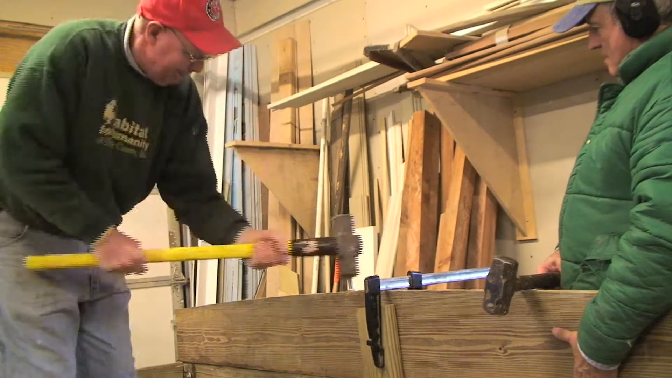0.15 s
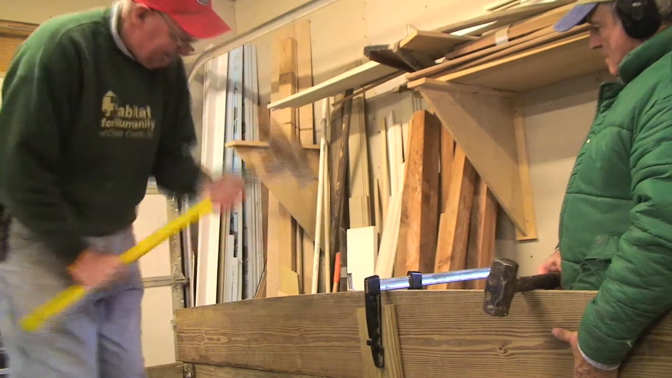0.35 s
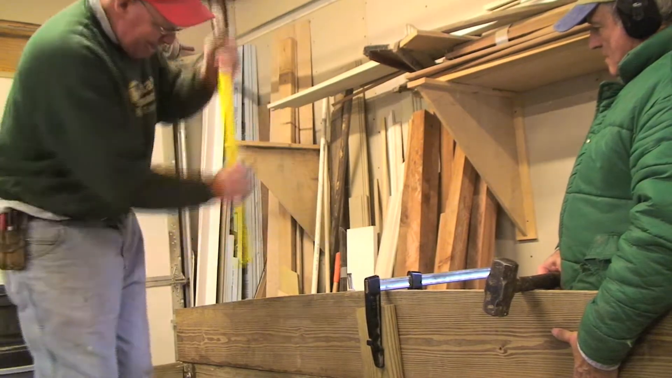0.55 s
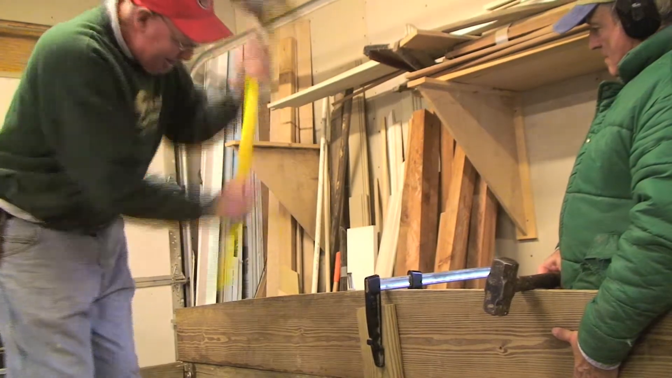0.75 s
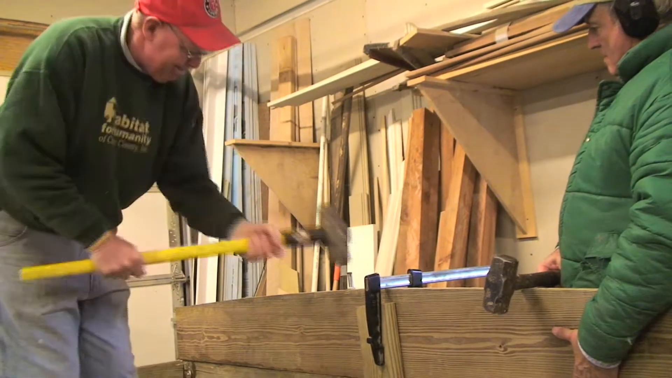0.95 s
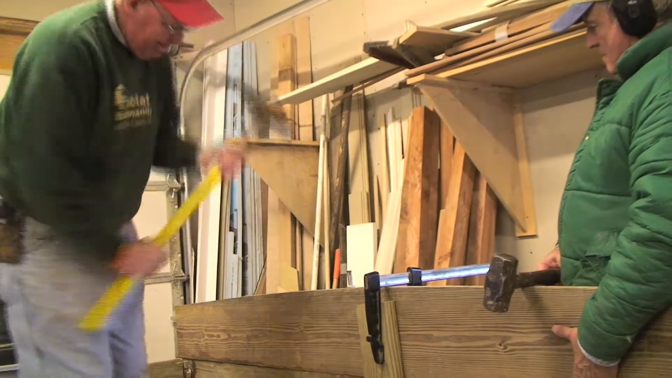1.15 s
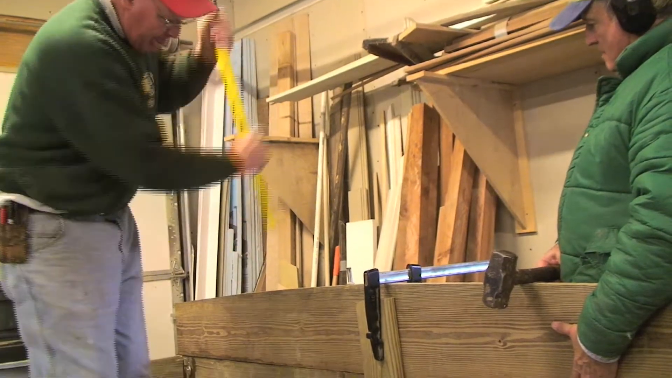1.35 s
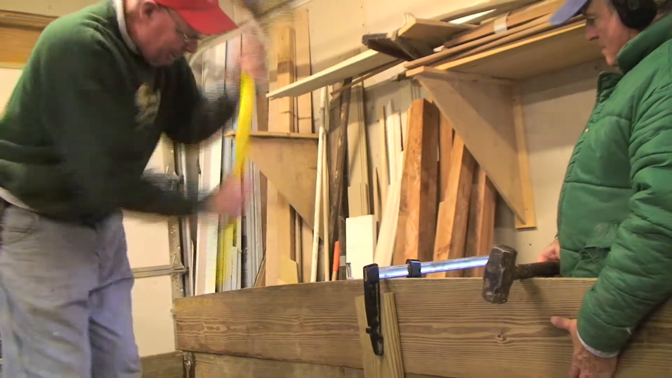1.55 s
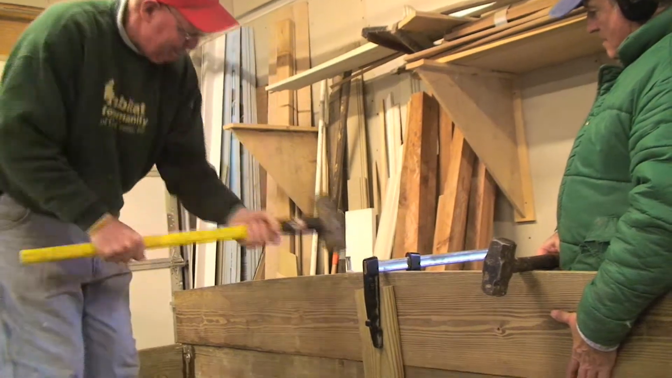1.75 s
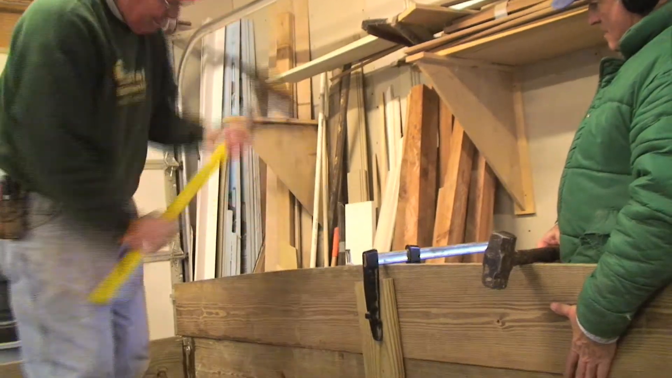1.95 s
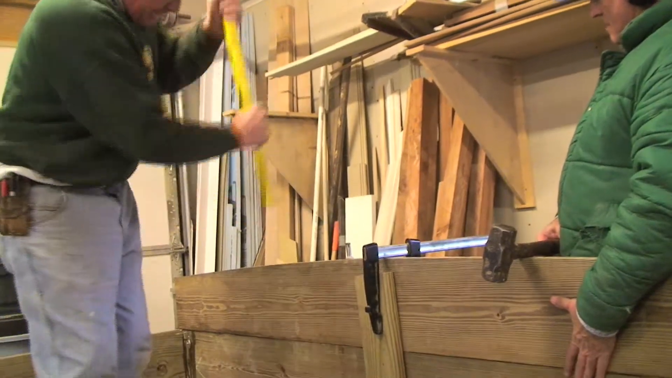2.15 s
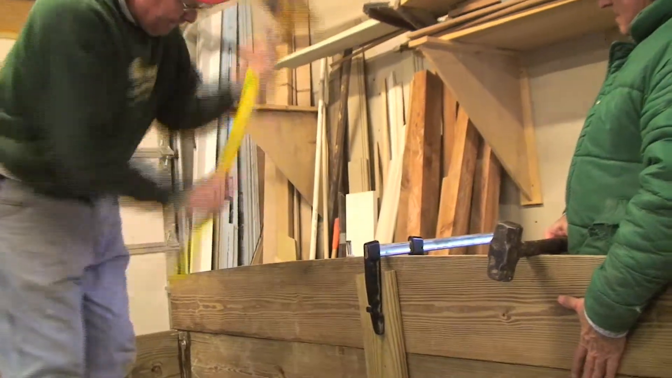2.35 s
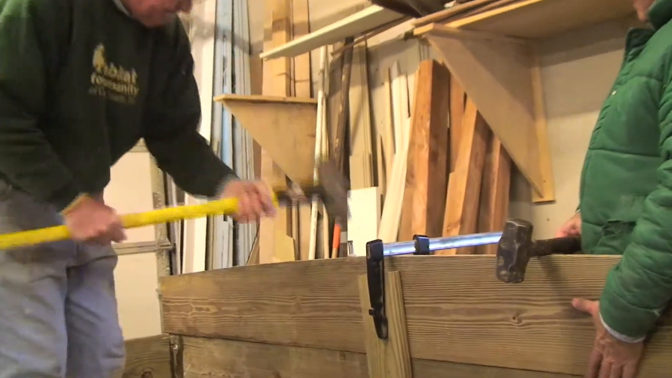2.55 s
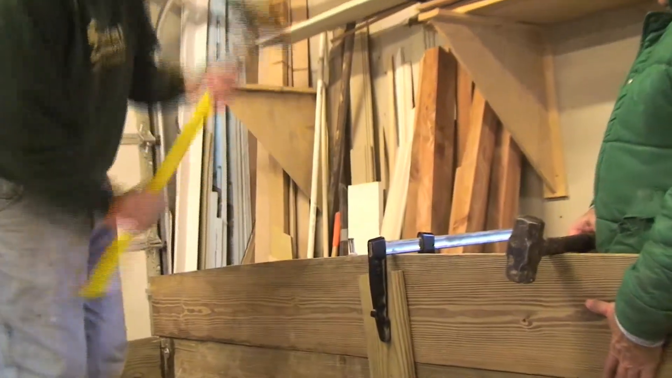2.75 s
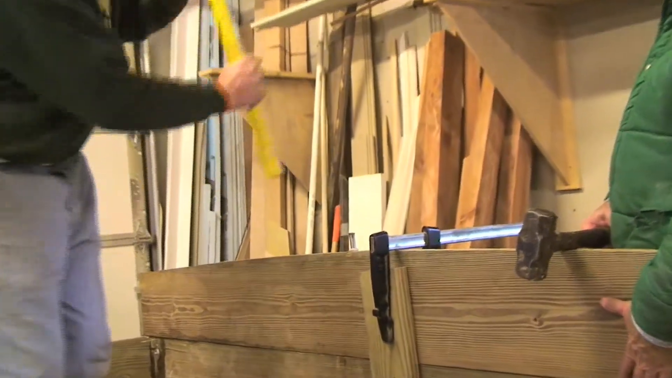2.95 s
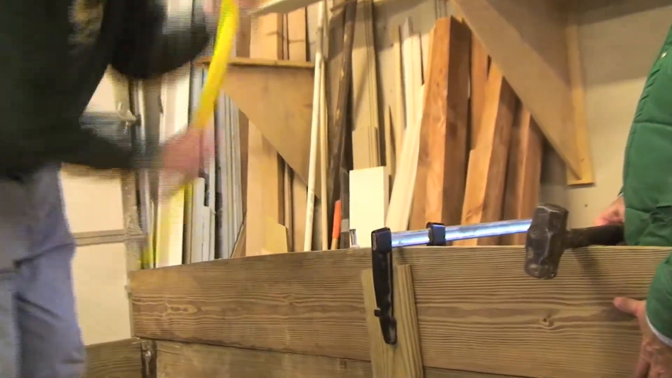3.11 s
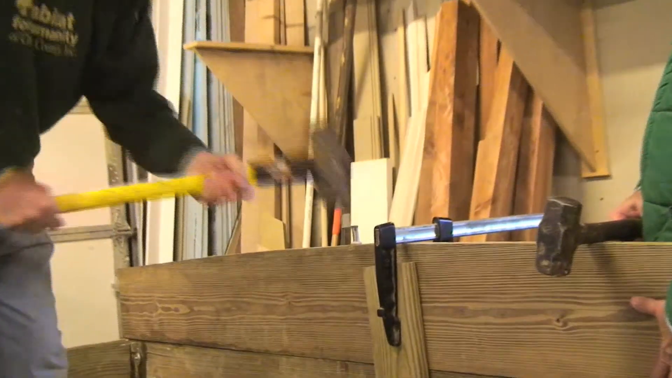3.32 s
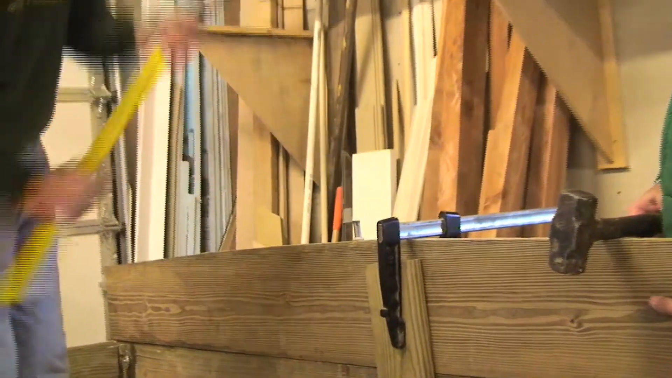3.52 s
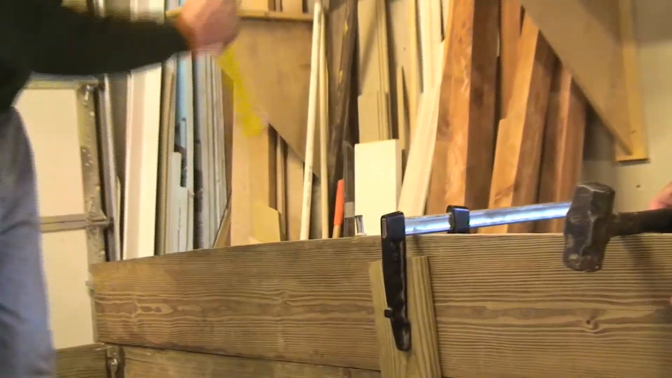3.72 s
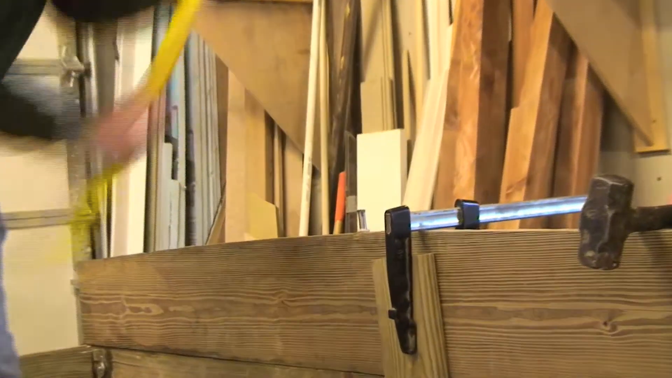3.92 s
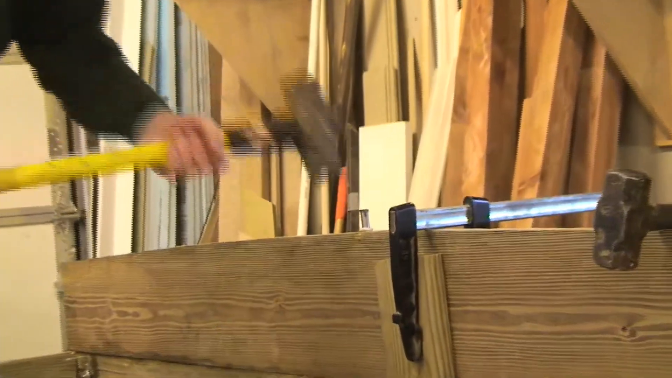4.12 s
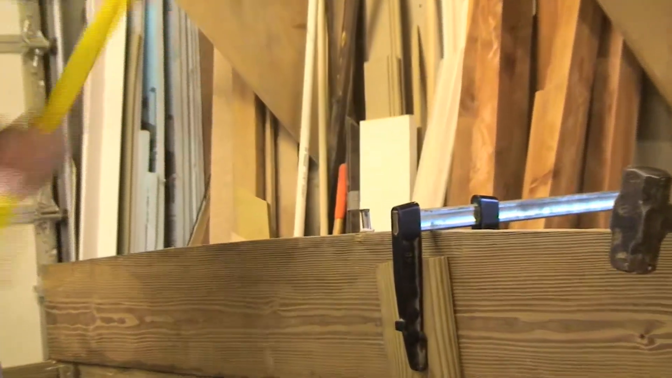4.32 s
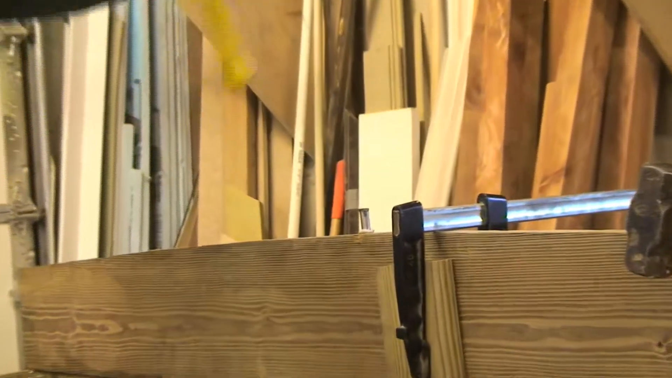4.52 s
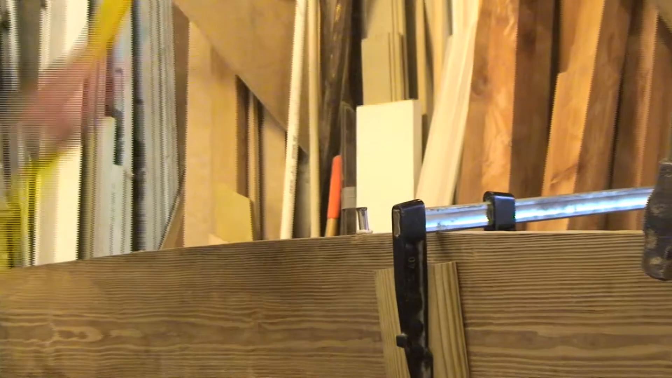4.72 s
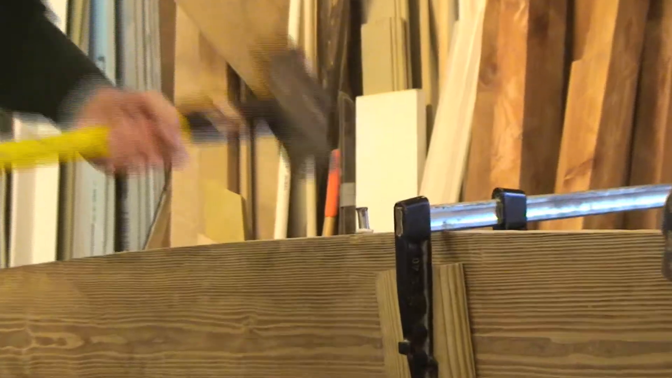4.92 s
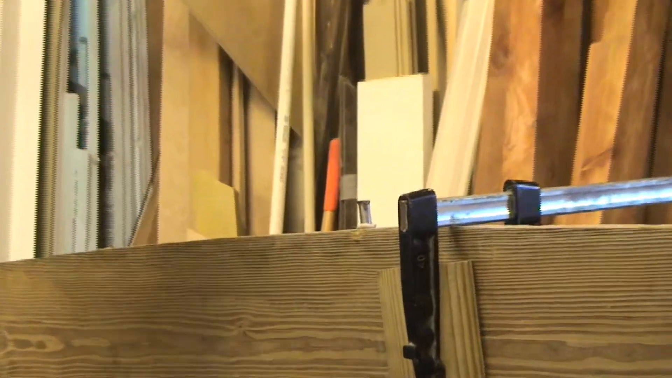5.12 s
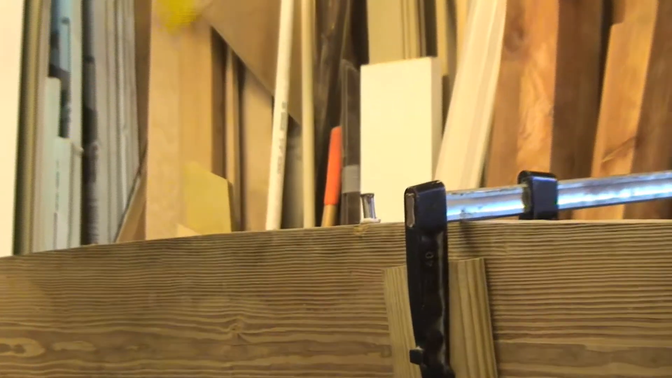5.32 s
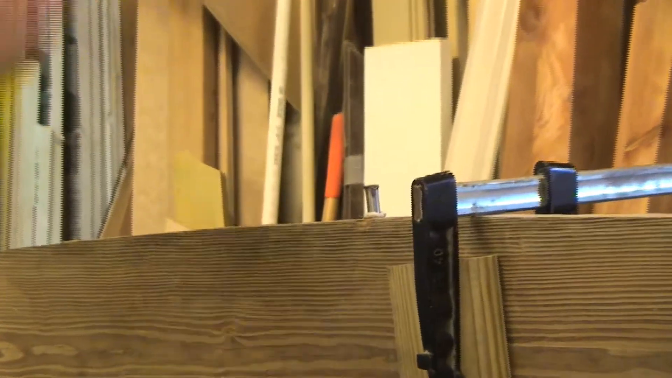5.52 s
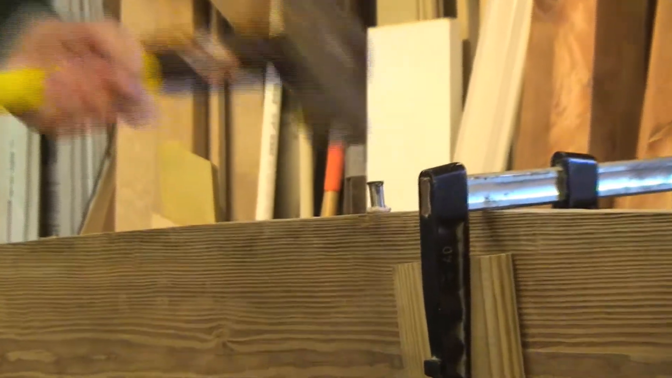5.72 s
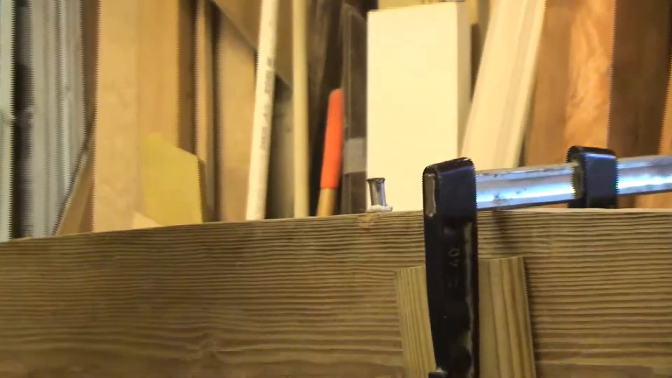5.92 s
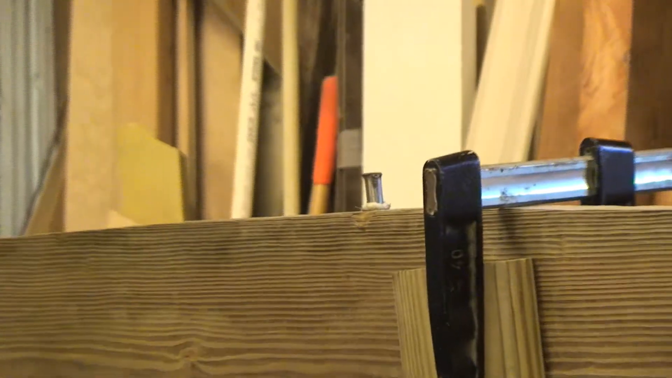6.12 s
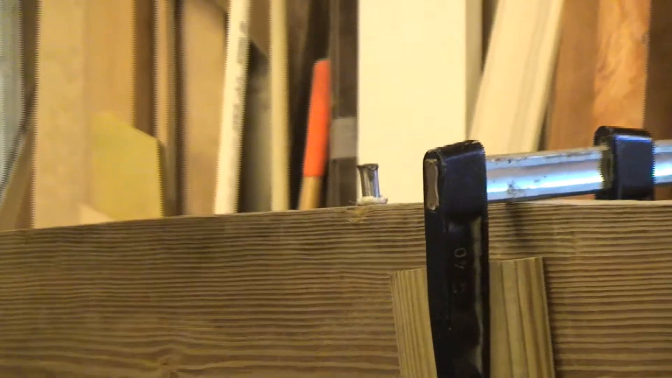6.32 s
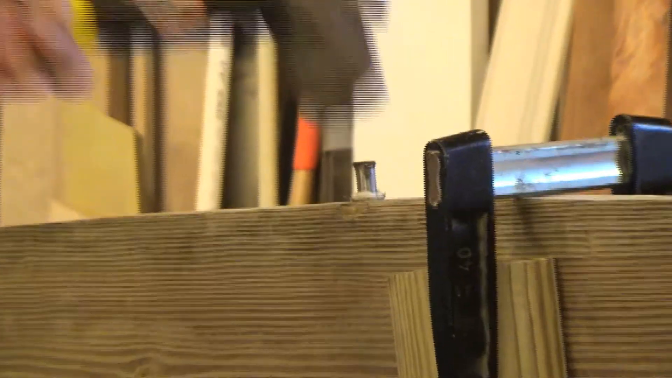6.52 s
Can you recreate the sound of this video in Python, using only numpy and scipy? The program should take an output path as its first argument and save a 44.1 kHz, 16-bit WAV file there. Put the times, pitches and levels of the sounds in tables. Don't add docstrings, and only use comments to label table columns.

```python
import sys
import numpy as np
from scipy import signal
from scipy.fft import rfft, irfft
from scipy.io import wavfile
from scipy.ndimage import uniform_filter1d

SR = 44100
rng = np.random.default_rng(int(sys.argv[2]) if len(sys.argv) > 2 else 0)


def linear_from_db(decibels):
    return 10 ** (np.asarray(decibels, float) / 20)


def wav_out(sig):
    wavfile.write(sys.argv[1], SR, np.round(np.clip(np.atleast_2d(sig).T, -1, 1) * 32767).astype(np.int16))


N = 289296

# (time [s], strength [dB], steel brightness [dB], wood weight [dB], bolt ring [dB])
BLOWS = [
    (0.135, 0, -2, 0.5, -8),
    (0.906, 0, -2.5, 0.5, 3.5),
    (1.699, -1.5, -1.5, 1.5, 2.5),
    (2.474, 0.5, -3, -1, -1.6),
    (3.248, 0, -2.5, -1, -2.2),
    (4.029, -1, -1, 0.5, 1.5),
    (4.832, -1.5, -1.5, 1, 1),
    (5.645, -1, -1.5, -0.5, 0.5),
    (6.458, 0, -2.5, -1.5, 0.8),
]
KNOCK_DB, CLANG_DB, ROOM_DB = -2.5, 2.5, -7
CLANG_LAG_S, START_OFFSET_S = .001, .0014
BOLT_HZ, BOLT_WIDTH_HZ = 2300, 690


def hammer(tails):
    out = np.zeros(N)
    t = np.arange(100) / SR
    knock, clang = wood_knock(), steel_clang()
    forerunner = ring([(2200, 0, .01)], size=500)
    woods = clamp() + planks(len(BLOWS))
    bolts = signal.lfilter(*signal.iirpeak(BOLT_HZ, BOLT_HZ / BOLT_WIDTH_HZ, fs=SR), tails)
    lows = signal.sosfilt(signal.butter(1, 1500, fs=SR, output="sos"), tails)
    chatter = rng.standard_normal((len(BLOWS), 100)) * np.exp(-t / 0.00017)
    chatter = uniform_filter1d(chatter, size=3)
    for blow, rough, tail, low, bolt, wood in zip(BLOWS, chatter, tails, lows, bolts, woods):
        s, db, steel_db, wood_db, bolt_db = blow
        s += START_OFFSET_S
        contact = .08 * rough
        contact[0] += 1
        wood_part = linear_from_db(wood_db) * (low + wood)
        steel_part = linear_from_db(steel_db) * (tail - low + (linear_from_db(bolt_db) - 1) * bolt)
        add(out, s, linear_from_db(db + ROOM_DB) * (wood_part + steel_part))
        add(out, s - CLANG_LAG_S, linear_from_db(db + KNOCK_DB + wood_db) * np.convolve(knock, contact))
        add(out, s - 1.8 * CLANG_LAG_S, linear_from_db(db - 20) * forerunner)
        add(out, s, linear_from_db(db + CLANG_DB + steel_db) * np.convolve(clang, contact))
    return out


# (frequency [Hz], level [dB], t60 [s])
KNOCK_MODES = [(980, 6, 0.0023), (1570, -2, 0.021), (2250, -6, 0.014), (138, -16, 0.074), (249, -9, 0.14),
               (419.7, -13.5, 0.63), (631, -16, .12), (862, -10.5, 0.19)]


def wood_knock():
    t = np.arange(2000) / SR
    return with_echoes(ring(KNOCK_MODES, size=2000) * (1 - np.exp(-(t / 0.00014) ** 2)))


# (frequency [Hz], level [dB], t60 [s])
CLANG_MODES = [(4360, 3.5, 0.0047), (3630, -8, 0.0013), (7230, -2, 0.0043), (11400, -21, 0.0013)]


def steel_clang():
    t = np.arange(2000) / SR
    return with_echoes(ring(CLANG_MODES, size=2000) * (1 - np.exp(-t / .00012)))


# (frequency [Hz], level [dB], t60 [s])
PLANK_MODES = [(94.3, -19.5, 1), (122.7, -13.5, 0.37), (162.2, -14.5, 0.22), (222.5, 3, .4),
               (264.2, -10, 0.34), (296.5, 2.5, .4), (310, -6, 0.18), (364, -8.5, 0.15), (368, -11, 0.17),
               (412.4, -4.5, 0.44), (476, -17, 0.19), (478, -7.5, 0.2), (520, -9.5, 0.21), (593, -15.5, 1),
               (623, -14, 0.15), (776, -11.5, 0.12), (692, -11.5, 0.14), (821, -10.5, .45),
               (968, -10.5, 0.18), (902, -8.5, 0.08), (1096, -7, 0.5), (1596, -17, 1), (1980, -14, 0.16),
               (2490, -10.5, 0.3), (3320, -22, .35), (4540, -21, 0.46), (12550, -31.5, .4)]
PLANKS_DB, SCATTER_DB = -6, 1.8


def planks(count):
    modes = [(-1) ** k * ring([mode], size=SR, swell=True) for k, mode in enumerate(PLANK_MODES)]
    scatter = SCATTER_DB * rng.standard_normal((count, len(PLANK_MODES)))
    return linear_from_db(PLANKS_DB + scatter) @ np.array(modes)


def clamp():
    t = np.arange(SR) / SR
    decay = linear_from_db(-17 - 60.0 * t / 0.94)
    beat = np.sin(2 * np.pi * 2.2 * t + 1.4)
    return decay * np.sin(2 * np.pi * 265 * t) * beat * np.minimum(t / 0.28, 1)


# (delay [s], level [dB])
ECHOES = [(.0025, -10), (.0065, -1), (.0100, -7), (0.016, -8.5), (0.023, -14)]
ECHO_TOP_HZ = 7900


def with_echoes(x):
    out = np.concatenate([x, np.zeros(2000)])
    dull = signal.lfilter(*signal.butter(2, ECHO_TOP_HZ, fs=SR), x)
    for lag_s, db in ECHOES:
        add(out, lag_s, linear_from_db(db) * dull)
    return out


# (frequency [Hz], level [dB per Hz])
ROOM_COLOUR = [(40, -18), (150, -7.5), (280, -1.5), (900, -9), (1300, -15), (1900, -13), (2600, -13),
               (2900, -16.5), (5000, -17), (5700, -23.5), (7800, -26), (8800, -34.5), (12800, -34.5),
               (16000, -38)]
# (frequency [Hz], t60 [s])
ROOM_T60 = [(60, .7), (250, 0.66), (700, 0.51), (2300, 0.51), (5000, 0.48), (9000, 0.42), (13000, 0.3),
            (16000, .25)]
# (frequency [Hz], time constant [s])
BUILD_UP = [(60, 0.085), (250, 0.023), (700, 0.004), (3000, 0.0011), (16000, 0.0017)]
# (frequency [Hz], share [0-1])
RENEWED = [(200, .08), (800, .25), (4000, .25), (10000, .4)]
MODAL_HZ = 580


def room_tails(count):
    t, tails = np.arange(SR) / SR, 0
    for hz in 50 * 2 ** (np.arange(26) / 3):
        rise = 1 - np.exp(-t / on_log(BUILD_UP, hz))
        band_db = on_log(ROOM_COLOUR, hz) + 10 * np.log10(hz / 1000)
        decay = linear_from_db(band_db - 60.0 * t / on_log(ROOM_T60, hz))
        sparse = 1 / (1 + (MODAL_HZ / hz) ** 2) ** .5

        def colour(f):
            return hump(hz, 1 / 6)(f) * linear_from_db(on_log(ROOM_COLOUR, f))

        same, *fresh = [noise(colour, size=SR) for _ in range(count + 1)]
        new = on_log(RENEWED, hz)
        pattern = np.sqrt(1 - new) * same + np.sqrt(new) * np.array(fresh)
        tails = tails + decay * sparse * rise * pattern
    loudest = np.max(uniform_filter1d(tails[0] ** 2, size=2000))
    return tails / loudest ** .5


# (time [s], level [dB])
TICKS = [
    (0.757, -48),
]
# (frequency [Hz], level [dB], t60 [s])
TICK_MODES = [(450, -5.5, .015), (900, 0, .01), (1900, -3, .006), (3800, -5, .007), (5900, -4, .008),
              (7000, -5.5, .005)]


def tick(tail):
    out, direct = np.zeros(N), ring(TICK_MODES, size=3000)
    short_tail = tail * linear_from_db(-90 * np.arange(SR) / SR)
    bright_tail = signal.lfilter([1, -.9], 1, short_tail)
    wet = signal.fftconvolve(direct, bright_tail)
    for s, db in TICKS:
        add(out, s, linear_from_db(db) * direct)
        add(out, s, linear_from_db(db - 11.5) * wet / np.std(wet[:4000]))
    return out


# (centre [Hz], spread [octaves])
MOVE_BANDS = [(58, .3), (250, .7), (2100, .35), (3300, .8)]
# (start [s], length [s], rumble level [dB])
GRIPS = [(0.0, 0.083, -66), (0.27, 0.088, -36.5), (0.46, 0.22, -54), (0.72, .16, -62), (1.21, .11, -45.5),
         (1.41, 0.12, -50.5), (2.13, 0.044, -51), (2.25, 0.06, -55), (2.34, .06, -46.5), (2.9, 0.094, -64),
         (3.62, 0.18, -55.5), (3.84, .07, -61), (3.92, 0.088, -54.5), (4.4, 0.052, -60), (4.54, .04, -55),
         (4.61, 0.053, -63.5), (5.29, 0.074, -56.5)]
# (start [s], length [s], level [dB])
STEPS = [
    (0.63, .05, -67.5),
    (0.82, 0.059, -57),
    (1.26, 0.029, -43.5),
    (1.39, 0.074, -52.5),
    (2.34, 0.048, -61),
    (3.74, 0.045, -65),
    (3.88, .1, -65),
    (4.54, 0.036, -58.5),
    (5.5, 0.16, -66.5),
    (6.38, 0.068, -69),
]
# (start [s], length [s], sleeve level [dB], swish level [dB])
RUBS = [
    (0.0, 0.15, -73.5, -89),
    (0.63, 0.035, -65.5, -73),
    (0.78, .12, -71.5, -74.5),
    (2.3, .17, -75.5, -80),
    (3.7, 0.3, -69.5, -74),
    (4.62, .2, -73.5, -80),
    (5.44, .12, -76.5, -84),
    (5.565, 0.07, -68, -62),
    (6.22, 0.3, -71, -72.5),
]
CLOTH_SLOWER = 2.5


def movement():
    rumble, shuffle, sleeve, swish = [noise(hump(hz, octaves)) for hz, octaves in MOVE_BANDS]
    out = gestures(GRIPS) * rumble * flicker(14, 1.3)
    out += gestures(STEPS) * shuffle * flicker(35, 1.4)
    out += gestures(RUBS, slower=CLOTH_SLOWER) * sleeve * flicker(30, 1.1)
    out += gestures(RUBS, column=3, slower=CLOTH_SLOWER) * swish * flicker(40, 1.4)
    return out + shudder()


EASE_IN_S, EASE_OUT_S = 0.028, .07


def gestures(rows, column=2, slower=1):
    t, power = np.arange(N) / SR, 0
    for row in rows:
        corners = [-EASE_IN_S * slower, 0, row[1], row[1] + EASE_OUT_S * slower]
        shape = np.interp(t - row[0], corners, [0, 1, 1, 0])
        power = power + (linear_from_db(row[column]) * shape ** 2) ** 2
    return np.sqrt(power)


SHUDDER_DB, SHUDDER_RISE_S, SHUDDER_T60_S = -34.5, 0.068, .8


def shudder():
    level, t = np.zeros(N), np.arange(SR) / SR
    for s, db, *_ in BLOWS:
        decay = linear_from_db(SHUDDER_DB + db - 60.0 * t / SHUDDER_T60_S)
        add(level, s, (1 - np.exp(-t / SHUDDER_RISE_S)) * decay)
    return level * noise(hump(73, .55))


# (frequency [Hz], level [dB per Hz])
SHOP_SPECTRUM = [(15, -23.5), (25, 2.5), (59, 0), (212, -6.5), (277, -3.5), (394, -8.5), (476, -18.5),
                 (531, -10), (1370, -22.5), (2350, -26), (5280, -33), (13600, -34), (16000, -50)]
SHOP_DB, DRONE_DB, DRONE_HZ = -64, -70, 268


def shop():
    drone = linear_from_db(DRONE_DB) * noise(hump(DRONE_HZ, 0.027)) * flicker(3, 1.2)
    return drone + linear_from_db(SHOP_DB) * noise(lambda hz: linear_from_db(on_log(SHOP_SPECTRUM, hz)))


# (frequency [Hz], time constant [s])
MODE_SWELL = [(100, 0.0064), (250, 0.054), (450, 0.019), (2500, .01)]
LONGEST_T60_S = .64


def ring(modes, size, swell=False):
    t, out = np.arange(size) / SR, 0
    for k, (hz, db, t60) in enumerate(modes):
        rise = 1 - np.exp(-(t / on_log(MODE_SWELL, hz)) ** 2) if swell else 1
        decay = linear_from_db(db - 60 * t / min(t60, LONGEST_T60_S))
        out = out + (-1) ** k * rise * decay * np.sin(2 * np.pi * hz * t)
    return out


def noise(gain_of_hz, size=N):
    hz = np.maximum(np.arange(size // 2 + 1) * SR / size, 1)
    x = irfft(rfft(rng.standard_normal(size)) * gain_of_hz(hz), size)
    return x / np.std(x)


def hump(centre_hz, octaves):
    return lambda hz: np.exp(-.5 * (np.log2(hz / centre_hz) / octaves) ** 2)


def flicker(rate_hz, depth_db):
    return linear_from_db(depth_db * noise(lambda hz: 1 / (1 + (hz / rate_hz) ** 2)))


def on_log(table, hz):
    rows = np.array(table)
    return np.interp(np.log(hz), np.log(rows[:, 0]), rows[:, 1])


def add(out, s, x):
    i = int(s * SR)
    out[i:i + len(x)] += x[:len(out) - i]


def scene():
    tails = room_tails(count=len(BLOWS))
    return (hammer(tails) + tick(tails[0]) + movement() + shop())[None]


def roll_off(x):
    return signal.sosfilt(signal.butter(12, 16480, fs=SR, output="sos"), x)


SQUEEZE_S, SQUEEZE_KNEE_DB, SQUEEZE = 0.01, -23, 0.18
CHARGE_S, SAG = .004, .2
TOP_HZ, PREAMP_HZ = 15750, 12000


def smoothed_level(x, seconds):
    leak = np.exp(-1 / (seconds * SR))
    return signal.lfilter([1 - leak], [1, -leak], np.minimum(np.abs(x), 1))


def record(dry):
    loudness = smoothed_level(dry, SQUEEZE_S)
    squeezed = linear_from_db(2.0) * dry * (1 + loudness / linear_from_db(SQUEEZE_KNEE_DB)) ** -SQUEEZE
    charge = smoothed_level(squeezed, CHARGE_S)
    ceiling = 1 - SAG * np.minimum(charge / .35, 1) ** 2
    flat = ceiling * squeezed / (ceiling ** 6 + squeezed ** 6) ** (1 / 6)
    cut = signal.sosfilt(signal.ellip(8, .2, 60, TOP_HZ, fs=SR, output="sos"), flat)
    mix = 0.95 * signal.lfilter(*signal.butter(1, PREAMP_HZ, fs=SR), cut)
    return roll_off(mix)


dry = scene()
out = record(dry)
wav_out(out)
```